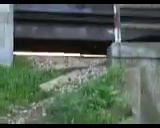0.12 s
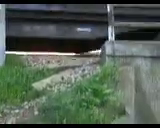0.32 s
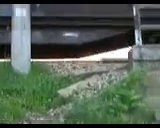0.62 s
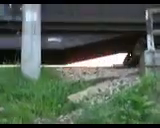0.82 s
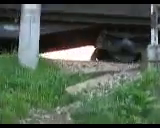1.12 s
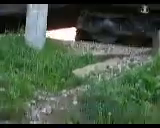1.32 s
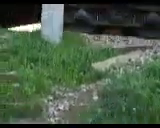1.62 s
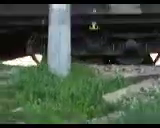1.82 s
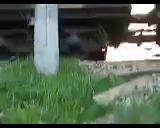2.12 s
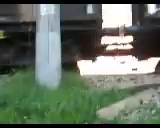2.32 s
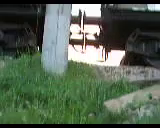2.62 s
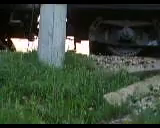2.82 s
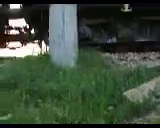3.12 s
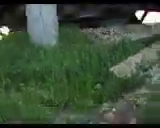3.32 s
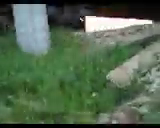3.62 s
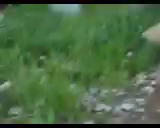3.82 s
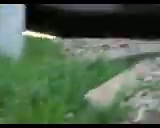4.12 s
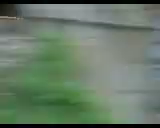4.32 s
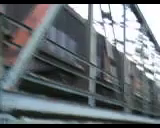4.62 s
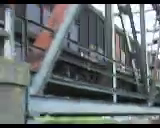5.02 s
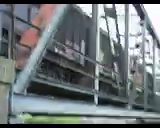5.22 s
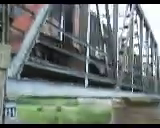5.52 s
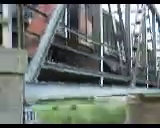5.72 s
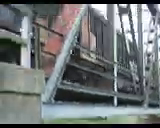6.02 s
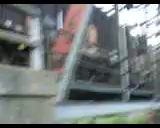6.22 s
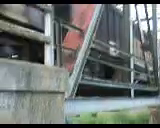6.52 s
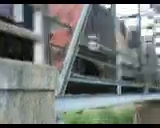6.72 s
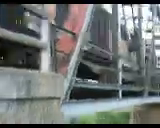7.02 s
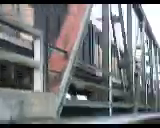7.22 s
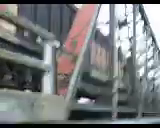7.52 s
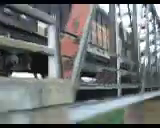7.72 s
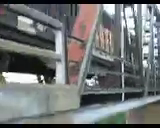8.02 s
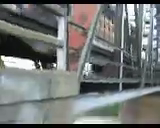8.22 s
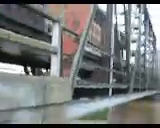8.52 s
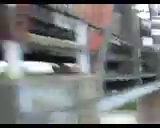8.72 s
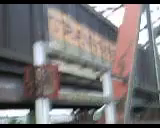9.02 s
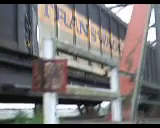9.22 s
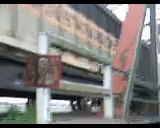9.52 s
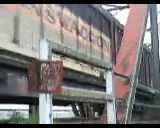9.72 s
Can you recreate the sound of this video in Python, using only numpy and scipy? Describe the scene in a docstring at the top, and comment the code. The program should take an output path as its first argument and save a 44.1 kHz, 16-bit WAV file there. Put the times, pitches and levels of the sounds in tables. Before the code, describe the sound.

Freight wagons rumble across a steel truss bridge, wheels thumping over joints, loose steel clattering in dense swells that sharpen into bright, ringing clanks.

```python
"""Freight wagons on a truss bridge

Place: the embankment beside a steel truss bridge; microphone: that of a small hand-held camera.
Filtered noise makes the span's rumble and the rails' roar; noise and tiny knocks make loose steel clatter
in dense swells as bogies pass. Wheels thump over joints, couplings clank through ringing modes, a wheel sings.
Near the end the rumble falls away and the clatter stands clear; the camera's gain ducks after loud clatter.
"""
import sys
import numpy as np
from scipy import signal
from scipy.fft import rfft, irfft, next_fast_len
from scipy.io import wavfile
from scipy.ndimage import uniform_filter1d

SR = 44100
rng = np.random.default_rng(int(sys.argv[2]) if len(sys.argv) > 2 else 0)


def store_wav(level_fs):
    """Save 16-bit WAV to argv[1]."""
    pcm = np.round(np.clip(np.atleast_2d(level_fs), -1, 1) * 32767)
    wavfile.write(sys.argv[1], SR, pcm.T.astype(np.int16))


N = 433944  # samples
# Source levels in the tables are those reaching the microphone, ahead of its capsule and the camera's gain.


def amp(db):
    """Decibels to an amplitude factor."""
    return 10 ** (np.asarray(db) / 20)


def evened(x):
    """Scales x to an rms of one."""
    return x / np.sqrt(np.mean(x ** 2) + 1e-20)


def curve(rows, axis):
    """One column of a table, read at every sample."""
    rows = np.array(rows)
    return np.interp(np.arange(N) / SR, rows[:, 0], rows[:, axis])


def add(mix, start_s, sound):
    """Lays a sound into the mix, cut off at the end of the mix."""
    part = mix[round(start_s * SR):][:len(sound)]
    part += sound[:len(part)]


def shaped(x, spectrum):
    """Filters x by a (pitch_hz, level_db) spectrum; nearly silent outside its ends."""
    point_hz, point_db = np.transpose(spectrum)
    size = next_fast_len(len(x))
    hz = np.fft.rfftfreq(size, 1 / SR) + 1  # the added 1 keeps the logarithm finite
    gain_db = np.interp(np.log(hz), np.log(point_hz), point_db, left=-90, right=-90)
    return irfft(rfft(x, size) * amp(gain_db), size)[:len(x)]


def colour(x, spectrum):
    """Filters x and evens its level."""
    return evened(shaped(x, spectrum))


def patchy(size, patchy_db, flicker_db):
    """Noise whose level drifts in patches of time and pitch and flickers across all pitches."""
    hop = size // 4
    frames, bins = N // hop + 6, size // 2 + 1
    real, imaginary, patches = rng.standard_normal((frames, bins, 3)).T
    patches = uniform_filter1d(patches, size=10, axis=0)  # smooth over pitch
    patches = evened(uniform_filter1d(patches, size=12, axis=1))  # smooth over time
    flicker = evened(uniform_filter1d(rng.standard_normal(frames), size=5))
    spectra = (real + 1j * imaginary) * amp(patchy_db * patches + flicker_db * flicker)
    return signal.istft(spectra, nperseg=size, noverlap=size - hop)[1][:N]


def ring(hz, db, t60):
    """One mode of a struck part: a sine dying by 60 dB in t60 seconds, cut at 60 ms."""
    t = np.arange(round(.06 * SR)) / SR
    return amp(db - 60 * t / t60) * np.sin(2 * np.pi * hz * t)


# The train's rolling as it crosses: time_s, rumble of the span level_db, its deep boom level_db,
# roar of the rails level_db
ROLLING_LEVELS = [(0, -25.5, -39, -26.5), (0.45, -23.5, -34.0, -27.0), (0.7, -27, -35.5, -29.5),
                  (1.1, -25, -31.5, -29), (1.4, -24.5, -33.5, -27.5), (1.75, -25.5, -26.5, -29),
                  (2.1, -27, -31, -25.5), (2.8, -22, -27.5, -28), (3.1, -27.5, -33, -26),
                  (3.85, -22.5, -26.5, -28.0), (4.4, -28.5, -37, -25), (4.65, -31.5, -37, -28.5),
                  (5.1, -27, -32, -29.5), (5.4, -28, -32.5, -26), (6.05, -25.5, -35, -26),
                  (6.63, -21, -28.5, -26.5), (6.68, -27, -31, -26), (7.3, -26.5, -30.5, -24),
                  (7.37, -34.5, -35, -30), (8, -33, -39.5, -26.5), (8.4, -37.5, -40, -26.5),
                  (9, -33, -38, -24.5), (9.84, -33.5, -39.5, -29)]
# Tone of the deep boom, the rumble and the roar: pitch_hz, relative level_db (per Hz)
BOOM_TONE = [(18, -13.5), (30, -1), (50, 1), (69, 5), (90, 1.5), (130, -14)]
RUMBLE_TONE = [(60, -35), (100, 1), (150, 2), (210, 1), (300, -1), (420, -7), (800, -23.5)]
ROAR_TONE = [(200, -24), (400, -7.5), (700, 2), (1100, 1.5), (1600, -3.5), (2600, -18)]


def rolling():
    """The span booms and rumbles under the load and rough rails roar: three bands of patchy noise."""
    boom = colour(patchy(size=2048, patchy_db=2.0, flicker_db=0.5), BOOM_TONE)
    drive = patchy(size=1024, patchy_db=0.96, flicker_db=0.5)  # shared by rumble and roar
    rumble = colour(drive, RUMBLE_TONE)
    roar = colour(drive, ROAR_TONE)
    out = amp(curve(ROLLING_LEVELS, axis=2)) * boom
    out += amp(curve(ROLLING_LEVELS, axis=1)) * rumble
    return out + amp(curve(ROLLING_LEVELS, axis=3)) * roar


# Steady clatter between the swells: time_s, wagons level_db, scrape of the wheels level_db, treble hiss level_db
STEADY_CLATTER = [(0, -29.5, -31.5, -34), (1, -32.5, -33, -38), (2.3, -28.5, -28, -32),
                  (3.5, -30.5, -35.0, -39), (4.2, -26.5, -29.0, -36.5), (5.1, -31.5, -32.5, -36.5),
                  (5.6, -26.5, -28, -34), (6.3, -26, -27.0, -32), (7.1, -25.5, -25.5, -32),
                  (8.3, -29, -34.5, -45.5), (9, -30.5, -35.5, -49), (9.84, -28.5, -32, -36.5)]
# Bursts of rattling as bogies and loose gear shake: start_s, hold_s, wagons level_db, scrape level_db,
# treble level_db, rise_db_per_s (the climb ahead of start_s)
SWELL_BURSTS = [(0, 0.129, -34, -34, -38, 50), (0.318, 0.078, -34, -35.5, -42.5, 205),
                (0.794, 0.033, -28.5, -32.5, -33, 210), (1.079, 0.06, -36, -39.5, -37.5, 209),
                (1.256, 0.029, -35.0, -30, -30, 900.5), (1.352, 0.1746, -33, -33.5, -35.5, 209.5),
                (1.752, 0.081, -29, -33.5, -34, 209), (2.044, 0.026, -26, -24.5, -28, 208.5),
                (2.44, 0.123, -28.5, -26.5, -33.5, 896.5), (2.729, 0.266, -27.5, -27.0, -30.5, 210.5),
                (3.055, 0.014, -21.5, -21, -28.5, 211), (3.183, 0.078, -25, -22.5, -29.5, 208),
                (3.374, 0.04, -26, -27, -32, 210), (3.492, 0.031, -28, -25.5, -32, 210.5),
                (3.617, 0.109, -25.5, -24, -34, 900), (3.827, 0.0788, -25.5, -27, -33.5, 208.5),
                (4.013, 0.056, -22.5, -21, -25.5, 210), (4.35, 0.228, -25.5, -22, -28, 208.5),
                (4.983, 0.009, -30.0, -32, -35, 211), (5.199, 0.239, -23.5, -20.5, -26.5, 898.5),
                (5.765, 0.0718, -24.5, -23.5, -27.5, 210), (5.921, 0.0923, -25, -25, -31, 210),
                (6.154, 0.007, -27, -28.5, -29, 901), (6.651, 0.0356, -22.0, -19.5, -24, 211.5),
                (6.925, 0.0096, -35, -25.5, -32, 898), (7.198, 0.098, -22.5, -25.5, -28, 211),
                (7.333, 0.015, -27.5, -16.5, -27.5, 896.5), (7.541, 0.114, -28.5, -22.5, -28.5, 903),
                (7.754, 0.14, -26, -23.5, -29.5, 901), (7.962, 0.074, -21, -16, -25, 899.5),
                (8.15, 0.13, -22, -17.5, -27, 903), (8.439, 0.013, -26, -23.5, -30, 210.5),
                (8.545, 0.106, -26, -23.0, -30, 209), (8.72, 0.16, -21, -22.5, -26.5, 214.5),
                (8.889, 0.0082, -21, -22, -30, 896), (9.062, 0.143, -27, -27.0, -32.5, 206),
                (9.26, 0.16, -20, -19.5, -25, 299.5), (9.543, 0.065, -23.5, -22.5, -27, 210)]
SWELL_FALL_DB_PER_S = 105


def rattling_db(axis):
    """Level of one clatter layer: the steady part plus every swell (rise, hold, fall), summed as power."""
    t, rows = np.arange(0, N / SR, .004), np.array(SWELL_BURSTS)
    start, hold, rise = rows[:, :1], rows[:, 1:2], rows[:, -1:]
    db = rows[:, axis + 1:axis + 2]
    db = db - rise * np.maximum(start - t, 0)
    db = db - SWELL_FALL_DB_PER_S * np.maximum(t - start - hold, 0)
    swells = np.interp(np.arange(N) / SR, t, (amp(db) ** 2).sum(axis=0))
    steady = amp(curve(STEADY_CLATTER, axis=axis)) ** 2
    return 10 * np.log10(swells + steady)


# Tone of the wagons, the scrape, the treble hiss and the highest treble: pitch_hz, relative level_db (per Hz)
BODY_TONE = [(800, -7), (1400, 5.5), (1900, 8.5), (2500, 7.5), (3000, -13), (4000, -71)]
SCRAPE_TONE = [(2000, -37.5), (2700, 6), (3200, 8.5), (3800, 5), (4400, 2.5), (5000, -10.5), (6000, -25)]
TREBLE_TONE = [(3500, -26.5), (4800, 1), (5600, 1.5), (6500, 0), (7300, -4.5), (8200, -16.5)]
TOP_TONE = [(6500, -9), (7300, -3), (8000, -0.5), (8500, -4), (8900, -5.5), (9400, -9)]
KNOCKS_PER_S, KNOCK_SPREAD_DB = 2500, 1.5  # mean rate; spread of the random strengths
KNOCK_SHARE_DB = -11  # knocks against the hiss
TOP_SHARE_DB = -9  # highest treble against the treble layer


def clatter():
    """Flickering hiss stands for a blur of knocks; beneath it single knocks each ring a loose part briefly."""
    strengths = amp(KNOCK_SPREAD_DB * np.minimum(rng.exponential(1, N), 5))
    strengths = strengths * (rng.random(N) < KNOCKS_PER_S / SR)
    parts_hz = np.geomspace(1100, 6500, num=60)
    part, knocks = rng.integers(0, len(parts_hz), N), np.zeros(N)
    for k, hz in enumerate(parts_hz):
        part_ring = np.sqrt(hz) * ring(hz, 0, .02)[:1500]  # higher parts ring louder
        knocks += signal.oaconvolve(strengths * (part == k), part_ring)[:N]
    hiss = evened(patchy(size=256, patchy_db=1.0, flicker_db=1.0))
    rattle = hiss + amp(KNOCK_SHARE_DB) * evened(knocks)
    out = np.zeros(N)
    for axis, tone in enumerate((BODY_TONE, SCRAPE_TONE, TREBLE_TONE), start=1):
        out += amp(rattling_db(axis)) * colour(rattle, tone)
    # the highest treble flickers on its own
    top = colour(patchy(size=256, patchy_db=2.0, flicker_db=0.5), TOP_TONE)
    return out + amp(rattling_db(axis=3) + TOP_SHARE_DB) * top


# Steel on steel: start_s, peak level_db, centre pitch_hz, brightness level_db (treble before peak scaling)
CLANK_BLOWS = [(0.8934, -18.0, 5700, -6.5), (1.257, -22.5, 3190, -11), (1.822, -11.5, 5040, -4.5),
               (2.059, -9.5, 3820, -2), (2.4433, -13.5, 4780, -16.5), (2.5178, -10, 3420, -3.5),
               (2.848, -12.5, 3260, -14.5), (3.039, -8, 3100, -7), (3.6157, -16.5, 3560, -6),
               (3.676, -14, 4260, -12.5), (3.841, -14.5, 3800, -6.5), (4.014, -11, 3540, -18),
               (5.197, -19.5, 3260, -17), (5.731, -17, 3500, -9), (6.1542, -14.5, 3220, -5),
               (6.6393, -5, 4230, -12.5), (6.9289, -6.5, 3140, -10.5), (7.232, -14.5, 4600, -6.5),
               (7.2866, -6, 3590, -11), (7.3297, -3, 3750, -2.5), (7.54, -13, 3740, -5),
               (7.61, -10.5, 3520, -8), (7.746, -6.5, 3170, -6), (7.9633, -3.0, 3680, -21),
               (8.0143, -4, 3380, -5), (8.1452, -13.5, 3640, -17), (8.2117, 0, 3720, -18),
               (8.5773, -10.5, 3600, -20), (8.6388, -3.5, 3100, -7), (8.7254, -3.5, 2990, -12),
               (8.8059, -3.5, 3720, -13), (8.8886, -8.5, 3560, -10.5), (9.205, -8, 2920, -13),
               (9.255, -4, 3720, -16), (9.3535, -1, 3200, -21.5), (9.426, -6, 3480, -25),
               (9.5308, -12.5, 3570, -15.5), (9.7652, -14.5, 3420, -10.5)]
# Modes of wheels and ironwork, before focus and damping: pitch_hz, level_db, ring time t60_s
STEEL_MODES = [(1250, 25, 0.47), (1739, -15.5, 0.12), (1915, -8, 0.07), (2140, -7, 0.28), (2626, 0.5, 0.16),
               (3000, -18.5, 0.14), (2990, -23, 0.22), (3250, -1.5, 0.049), (3560, 1.5, 0.036),
               (3720, 0.5, 0.37), (3890, -2, 0.34), (4100, 5.5, 0.42), (4670, -15, 0.062),
               (5360, -15.5, 0.12), (5300, 4.5, 0.44), (5170, -16.5, 0.051), (6500, -18, 0.23),
               (6460, 1.5, 0.1), (7400, -12.5, .08)]
RATTLE_S = 0.027  # time constant of the dying rebounds
FOCUS_DB_PER_OCTAVE = 32  # how fast modes weaken away from the pitch centre
RING_SHARE, LONGEST_RING_S = 0.21, 0.036  # parts pressed together damp even the long modes
CRASH_DB = -4  # level of the grit
FIRST_CONTACT = 0.34  # extra strength of the first few milliseconds of a blow


def clanks():
    """A blow and its dense rebounds strike steel: a gritty crash, with modes near the pitch centre ringing."""
    out, t = np.zeros(N), np.arange(round(.12 * SR)) / SR
    for start_s, peak_db, centre_hz, bright_db in CLANK_BLOWS:
        fade = np.minimum(t / .0012, 1) * np.exp(-t / RATTLE_S)
        fade *= 1 + FIRST_CONTACT * np.exp(-t / .004)  # the first contact is hardest
        grit, crack = rng.standard_normal((2, len(t)))
        modes = 0
        for hz, mode_db, t60 in STEEL_MODES:
            focused_db = mode_db - FOCUS_DB_PER_OCTAVE * abs(np.log2(hz / centre_hz))
            modes = modes + ring(hz, focused_db, min(RING_SHARE * t60, LONGEST_RING_S))
        rung = signal.fftconvolve(grit * fade, modes)[:len(t)] / np.linalg.norm(modes)
        # grit peaks at the pitch centre
        bump = [(.4 * centre_hz, -25), (.8 * centre_hz, -8), (centre_hz, 0),
                (1.25 * centre_hz, -8), (2 * centre_hz, -25)]
        crash = rung + amp(CRASH_DB) * fade * colour(grit, bump)
        crash += amp(bright_db) * fade * colour(crack, TREBLE_TONE)
        add(out, start_s, amp(peak_db) * crash / abs(crash).max())
    return out


# Wheels over rail joints: start_s, peak level_db, length_s (from the start to the fade)
JOINT_THUMPS = [(1.871, -9, .045), (3.872, -8.5, .05), (4.318, -9, .04), (5.262, -6.5, 0.052),
                (5.69, -7.5, .07), (6.136, -12, 0.023)]
# Tone of the shaken deck: pitch_hz, relative level_db (per Hz)
THUD_TONE = [(60, -5), (130, 0.5), (220, -1.5), (400, -3.5), (800, -3), (1100, -10.5), (1500, -25)]
THUMP_RISE_S, THUMP_FADE_S = .015, 0.032  # linear rise; fade time constant


def thumps():
    """A wheel drops over a joint and shakes the deck for a moment: a short burst of low noise."""
    out, t = np.zeros(N), np.arange(round(.2 * SR)) / SR
    for start_s, peak_db, length_s in JOINT_THUMPS:
        fade = np.exp(-np.maximum(t - length_s, 0) / THUMP_FADE_S)
        shape = np.minimum(t / THUMP_RISE_S, 1) * fade
        shake = shape * colour(rng.standard_normal(len(t)), THUD_TONE)
        add(out, start_s, amp(peak_db) * shake / abs(shake).max())
    return out


# a wheel sings with the scrape from SING_FROM_S on, higher the harder it scrapes
SING_FROM_S, SING_SHARE_DB = 6.85, -7  # level against the scrape
SING_HZ, SING_HZ_PER_DB, SING_MID_DB = 3544, 18, -22.5  # pitch when the scrape is at SING_MID_DB


def singing():
    """Noise through one narrow resonance whose level and pitch follow the scrape."""
    scrape_db = rattling_db(axis=2)
    pitch_hz = SING_HZ + SING_HZ_PER_DB * (scrape_db - SING_MID_DB)
    turn = np.exp(2j * np.pi * np.cumsum(pitch_hz) / SR)
    # complex noise smoothed by two equal one-pole filters, then carried up to the pitch
    pole = np.exp(-np.pi * 350. / SR)
    noise = [1, 1j] @ rng.standard_normal((2, N))
    slow = signal.lfilter([1], np.convolve([1, -pole], [1, -pole]), noise)
    sounding = np.clip((np.arange(N) / SR - SING_FROM_S) / .1, 0, 1)
    return amp(scrape_db + SING_SHARE_DB) * sounding * evened((turn * slow).real)


# Thin high ticks: start_s, level_db (of the noise before its rise and fade)
HIGH_TICKS = [(0.8899, -36), (1.067, -35), (1.1313, -32.0), (1.8238, -37), (2.5187, -34), (2.8429, -33),
              (3.3787, -27), (4.0362, -41), (4.1904, -26.5), (6.0387, -33.0), (6.6403, -29),
              (6.9192, -26.5), (7.7458, -27), (7.9179, -26), (8.109, -24.5), (8.2696, -26), (8.3404, -24.5),
              (8.3764, -26), (9.1631, -25), (9.2569, -23)]
TICK_HZ = 7450


def ticks():
    """Brief narrow puffs of noise at the top of the range."""
    out, t, hz = np.zeros(N), np.arange(round(.05 * SR)) / SR, TICK_HZ
    band = [(.85 * hz, -25), (.97 * hz, -3), (1.03 * hz, 0), (1.15 * hz, -6), (1.3 * hz, -25)]
    shape = np.minimum(t / .003, 1) * np.exp(-t / 0.017)
    for start_s, level_db in HIGH_TICKS:
        puff = colour(rng.standard_normal(len(t)), band)
        add(out, start_s, amp(level_db) * puff * shape)
    return out


# the camera's gain listens above SENSE_HZ, falls while the output exceeds the threshold, then creeps back
SENSE_HZ, SENSE_S, THRESHOLD_DB = 1490, 0.026, -22.5
FALL_PER_S, RECOVER_S = 21.5, 1  # dB per second for each dB of excess; recovery time constant
STEP = 441  # samples per gain step


def gain_control(x):
    """Feedback gain: drops in proportion to the excess of the treble output, recovers slowly."""
    heard = signal.sosfilt(signal.butter(4, SENSE_HZ, "high", fs=SR, output="sos"), x)
    power = (heard[:N // STEP * STEP].reshape(-1, STEP) ** 2).mean(axis=1)
    dt = STEP / SR
    keep, felt, gain_db, gains = np.exp(-dt / SENSE_S), 1e-9, 0., []
    for p in power:
        gains.append(gain_db)
        felt = keep * felt + (1 - keep) * p * amp(gain_db) ** 2
        over_db = max(10 * np.log10(felt) - THRESHOLD_DB, 0)
        gain_db = min(gain_db - dt * (gain_db / RECOVER_S + FALL_PER_S * over_db), 0)
    return x * amp(np.interp(np.arange(N), np.arange(len(gains)) * STEP, gains))


def scene():
    """All the sounds of the bridge as they reach the embankment, in one channel."""
    return (rolling() + clatter() + singing() + clanks() + ticks() + thumps())[None]


# Response of the microphone capsule: pitch_hz, level_db
CAPSULE_RESPONSE = [(10, 0), (6000, 0), (7500, -5), (8300, -12), (8900, -26), (9400, -50)]
EDGE_HZ = 9050  # upper band limit
OFFSET = -.0688  # constant offset of the converter, full scale = 1


def record(dry):
    """The capsule loses top treble, the gain ducks after loud clatter, a band limit and offset follow."""
    captured = gain_control(shaped(dry[0], CAPSULE_RESPONSE))[None]
    edge = signal.firwin(511, EDGE_HZ, window=("kaiser", 9), fs=SR)[None]
    return signal.oaconvolve(captured, edge, "same") + OFFSET


dry = scene()
out = record(dry)
store_wav(out)
```